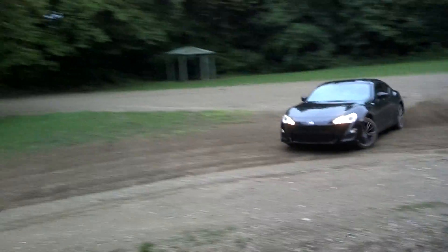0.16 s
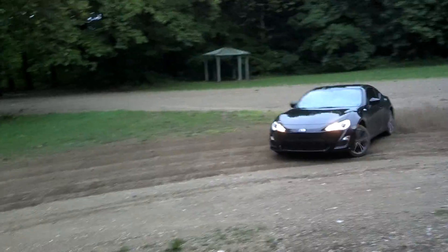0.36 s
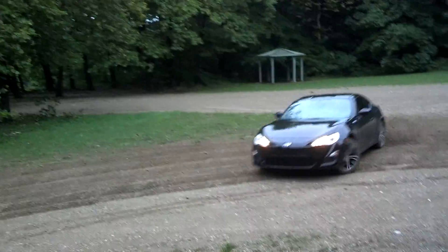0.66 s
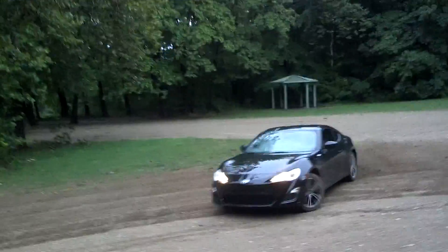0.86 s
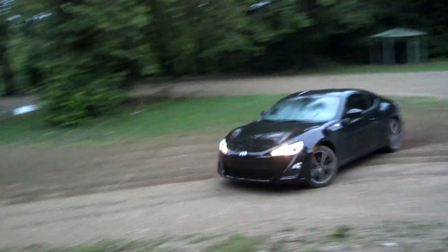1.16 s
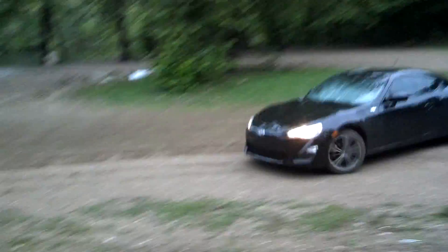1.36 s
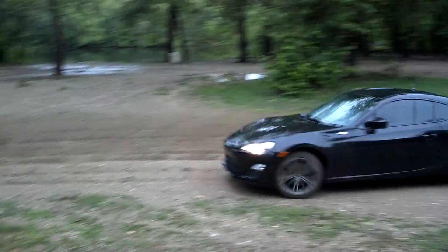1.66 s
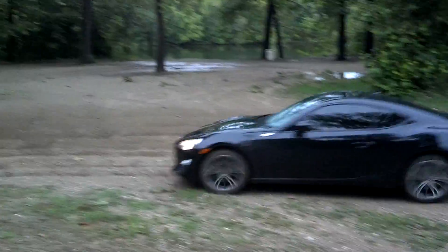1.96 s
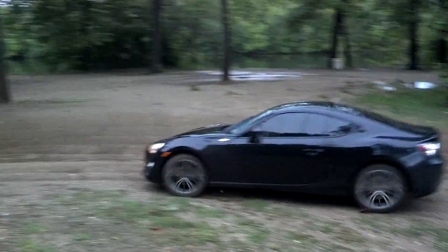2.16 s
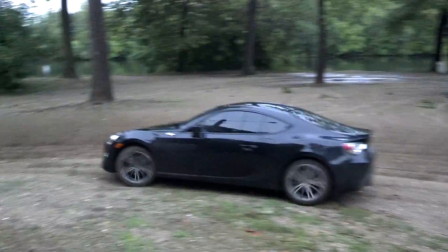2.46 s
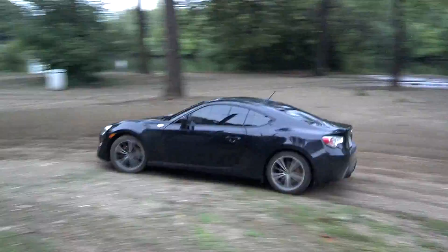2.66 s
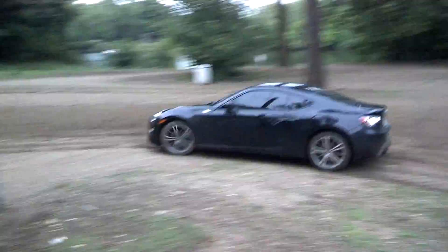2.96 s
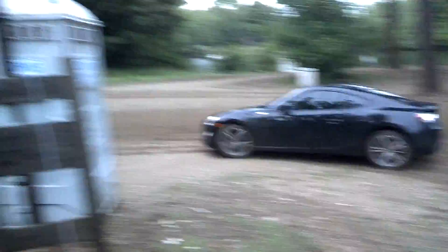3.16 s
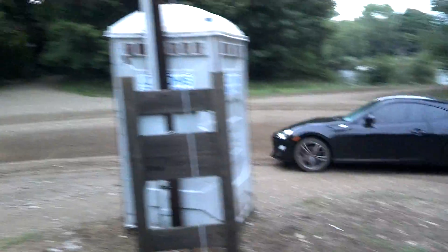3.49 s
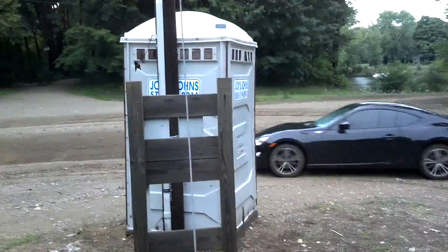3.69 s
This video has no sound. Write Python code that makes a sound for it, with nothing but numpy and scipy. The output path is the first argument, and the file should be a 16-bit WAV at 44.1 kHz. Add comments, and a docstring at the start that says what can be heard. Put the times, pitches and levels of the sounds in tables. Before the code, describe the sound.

Car tyres slide and crunch over loose gravel, stones cracking against the arches, engine humming low

```python
"""Car sliding past on wet gravel

Tyres grind over gravel: five bands of patchy noise and random stone clicks, from low rumble to spray.
Thrown stones ring the wheel arches, clods thump under the floor and pebbles tick, as decaying tones and puffs.
Under it the engine hums, as four sines locked to a gliding firing rate.
A small camera picks it up with one microphone and widens it into stereo by shifts of phase and level.
"""
import sys
import numpy as np
from scipy import signal
from scipy.fft import rfft, irfft, next_fast_len
from scipy.io import wavfile
from scipy.ndimage import uniform_filter1d, map_coordinates

SR = 44100
rng = np.random.default_rng(int(sys.argv[2]) if len(sys.argv) > 2 else 0)


def log_audio(samples):
    """Write samples as a 16-bit WAV file to the path given in sys.argv[1]."""
    # one column per channel
    frames = np.atleast_2d(samples).T
    # limit to full scale, then quantise
    limited = np.clip(frames, -1, 1)
    pcm = np.round(limited * 32767).astype(np.int16)
    wavfile.write(sys.argv[1], SR, pcm)


N = 168903

# Course of the slide. Each row: time in seconds, then the base levels of growl, grind, hiss, spray
# and rumble, each in dB.
SLIDE_LEVELS = [(0.0, -30, -30, -39, -40, -34), (0.02, -30.5, -29.5, -28.5, -40, -35),
                (0.07, -32.5, -28.5, -39.5, -44, -43.5), (0.1, -32.5, -27, -41, -45.5, -39.5),
                (0.38, -30.5, -26.5, -38, -43.5, -33), (0.49, -33, -24.5, -36, -46, -35),
                (0.5, -24.5, -22.5, -35, -47, -35), (0.6, -31, -25.5, -37, -46, -32),
                (0.8, -31.5, -26, -37, -46, -35), (1.04, -28, -22.5, -35, -46, -35),
                (1.08, -29.5, -26, -39.5, -49, -32.5), (1.23, -30.5, -25, -34, -48, -38.5),
                (1.36, -31, -26.5, -36, -48, -33.5), (1.41, -32, -27.5, -34.5, -48, -33),
                (1.45, -30, -21.5, -30.5, -46, -41), (1.47, -36, -29.5, -37, -47, -38.5),
                (1.52, -36, -26, -29.5, -40.5, -35), (1.66, -38.5, -34, -40, -52, -39.5),
                (1.91, -35, -32, -33, -44.5, -37), (2.07, -34, -31, -36, -49, -39),
                (2.212, -32.5, -27.5, -33.5, -44, -34.5), (2.233, -31, -27, -32.5, -40, -44),
                (2.238, -35, -28, -29, -37, -44), (2.256, -27, -28, -32.5, -45, -49),
                (2.27, -37.5, -36.5, -38, -50, -42), (2.41, -39.5, -34.5, -41, -52, -41),
                (2.53, -41.5, -31, -36.5, -48, -47), (2.57, -40, -39.5, -38, -49, -44),
                (2.63, -41, -29, -36.5, -46, -42.5), (2.69, -39, -31.5, -37, -48, -44.5),
                (2.86, -37.5, -29, -36, -47, -39), (3.0, -34, -26, -32, -39, -41.5),
                (3.15, -37, -29, -34.5, -45, -39), (3.21, -32, -25.5, -32.5, -45, -37.5),
                (3.23, -39.5, -33, -38, -49, -40.5), (3.39, -33.5, -32, -35.5, -50, -39.5),
                (3.57, -40.5, -32, -43.5, -52, -41.5), (3.59, -27.5, -31.5, -43, -44, -41),
                (3.64, -44, -33.5, -42, -55, -44), (3.69, -35.5, -29, -38.5, -51, -40.5),
                (3.83, -35.5, -32, -40.5, -55, -39)]

# Colours of the tyre bands, low to high. Each row: frequency in Hz, relative density in dB per Hz.
RUMBLE_COLOUR = [(20, -70), (45, -89), (65, -74.5), (110, -60), (200, -57.5), (290, -52.5), (340, -83.5),
                 (420, -120)]
GROWL_COLOUR = [(200, -110), (290, -64), (340, -61), (480, -55), (620, -57), (740, -62), (900, -103),
                (1300, -140)]
GRIND_COLOUR = [(450, -110), (600, -80.5), (740, -62.5), (1000, -52.5), (1200, -59.5), (1440, -58),
                (1680, -64.5), (1930, -61), (2200, -68.5), (2500, -66.5), (2800, -70.5), (3300, -72),
                (4500, -140)]
HISS_COLOUR = [(1500, -130), (2200, -85), (2700, -72), (3200, -68.5), (3800, -71), (4700, -76.5),
               (6500, -76), (8800, -79.5), (10000, -87), (11500, -110)]
SPRAY_COLOUR = [(6000, -140), (8500, -98), (9800, -89), (11000, -88), (13000, -88.5), (14200, -86.5),
                (15800, -86)]

# Stones striking the wheel arches. Each row: start in seconds, level in dB, pitch in Hz,
# time for the ring to fall 60 dB in seconds.
ARCH_STONES = [(0.013, -15, 980, .02), (0.353, -6, 1160, .012), (0.652, -10.5, 1054, 0.022),
               (0.946, -10, 1050, 0.018), (1.031, -11, 1430, 0.034), (1.044, -16, 1000, 0.025),
               (1.153, -7.5, 972, .02), (1.432, -10, 1010, 0.017), (2.2348, -10, 1300, 0.028),
               (2.7996, -1.5, 1007, 0.006), (3.157, -13.5, 1430, 0.036), (3.204, -14, 947, 0.023),
               (3.334, -9, 945, 0.0087)]
# Clods under the floor. Each row: start in seconds, level in dB, pitch in Hz.
FLOOR_CLODS = [(1.359, -15, 587), (3.224, -17, 274), (3.242, -17, 395), (3.334, -22, 550),
               (3.594, -16.5, 432.4)]
# Bright pebble ticks. Each row: start in seconds, level in dB before a 1.5 dB trim.
PEBBLE_TICKS = [(3.2103, -19), (3.281, -23)]

# Course of the engine. Each row: time in seconds, mean firing rate in Hz, level in dB.
ENGINE_COURSE = [(0, 188.4, -43), (.1, 194.8, -36.5), (.3, 206.6, -38), (.5, 210, -42), (.63, 195, -61),
                 (.69, 182.2, -33), (.92, 181.5, -34.5), (.98, 173, -49.5), (1.45, 160.1, -48),
                 (1.6, 141.6, -43.5), (1.72, 141, -40), (1.96, 148, -36), (2.3, 150.4, -40.5),
                 (2.47, 124.2, -45.5), (2.58, 117, -48), (2.7, 215, -49), (2.75, 222.7, -42.5),
                 (2.95, 227, -44.5), (3.1, 238, -56), (3.38, 229.7, -42), (3.62, 231, -43),
                 (3.83, 238, -58)]
# Engine orders. Each row: multiple of the firing rate, level in dB, depth of the level waver in dB.
ENGINE_ORDERS = [(.5, -13, 3), (1, 0, .8), (1.5, -7, 3), (2, -7, 3)]

# The stereo widener, right against left. Each row: frequency in Hz, phase lead in radians,
# level in dB, unrelated share from 0 to 1. Ignored inside the band where both sides are the same.
WIDENER = [(40, 2.4, 1.5, .3), (130, 1.6, 2, .12), (240, .7, 0, .15), (300, .6, -5, .3), (350, 1.2, -3, .2),
           (470, .6, 1.7, .1), (650, .05, -.5, .17), (730, .3, -5, .28), (785, .8, -1.5, .2),
           (960, .25, 1.7, .1), (1120, 0, 0, .05), (1200, 0, 0, .02), (1540, 0, 0, .03), (1650, 0, 1, .2),
           (1830, 0, 0, .25), (2000, .4, 2.5, .3), (2130, 0, 8, .45), (2280, -1.1, 5, .6),
           (2450, -1.8, 4.5, .9), (2560, -2.7, 2.5, 1)]

CRACK_DB, CRACK_T60_S = -16, 0.0062  # level is relative to the stone
CLOD_T60_S = 0.036
TICK_HZ, TICK_T60_S = 6280, 0.023
PITCH_WAVER = .003  # share of the firing rate
SAME_FROM_HZ, SAME_TO_HZ = 1190, 1545  # both sides alike between these
TREBLE_LAG_SAMPLES, TREBLE_UNRELATED = 16, .5  # delay of the right side; share from 0 to 1
TOP_HZ = 15770


def amp(db):
    """Decibels to amplitude."""
    return 10 ** (np.asarray(db) / 20)


def unit(x):
    """Scale to an rms of 1."""
    return x / np.sqrt(np.mean(x ** 2) + 1e-20)


def along(points, hz):
    """Columns after the frequency, read on a log axis."""
    f, *cols = np.transpose(points)
    return [np.interp(np.log(hz + 1), np.log(f + 1), c) for c in cols]


def curves(rows):
    """One value per sample for each column after the time."""
    s, *cols = np.transpose(rows)
    return [np.interp(np.arange(N) / SR, s, c) for c in cols]


def wobble(rate):
    """A smooth random curve with this many knots a second."""
    knots = rng.standard_normal(int(N * rate / SR) + 4)
    return map_coordinates(knots, [np.arange(N) * rate / SR])


def filtered(x, response):
    """Apply a complex response of frequency, padded so that tails do not wrap round."""
    m = 2 * next_fast_len(N // 2 + SR // 4)
    return irfft(rfft(x, m) * response(np.fft.rfftfreq(m, 1 / SR)), m)[..., :N]


def causal(colour):
    """Minimum-phase response of a colour, so that it rings only after each click."""
    def response(hz):
        cepstrum = irfft(np.log(amp(along(colour, hz)[0])))
        half = len(cepstrum) // 2
        # fold the part before time zero onto the part after it
        cepstrum[1:half] *= 2
        cepstrum[half + 1:] = 0
        return np.exp(rfft(cepstrum))[:len(hz)]
    return response


def crunch(colour, per_s, spread_db, grain_share, patchy_db):
    """Gravel under load: patchy noise mixed with random stone clicks, coloured, rms 1."""
    z = signal.stft(rng.standard_normal(N), nperseg=512)[2]
    field = uniform_filter1d(rng.standard_normal(z.shape), 5, 0)  # patches across frequency
    field = uniform_filter1d(field, 6, 1)  # and across time
    bed = unit(signal.istft(z * amp(patchy_db * unit(field)), nperseg=512)[1][:N])
    chance, sign, size = rng.random((3, N))
    # many small clicks, few large ones
    size = amp(-spread_db * np.log(size + 0.0064))
    clicks = unit((chance < per_s / SR) * np.sign(sign - .5) * size)
    share = np.clip(grain_share, 0, 1)  # share of the power
    mix = np.sqrt(1 - share) * bed + np.sqrt(share) * clicks
    return unit(filtered(mix, causal(colour)))


def tyres():
    """Five bands of the slide; clumps of gravel shake all but the rumble together."""
    growl_db, grind_db, hiss_db, spray_db, rumble_db = curves(SLIDE_LEVELS)
    clumps = 0.69 * wobble(29.94) + wobble(110)  # dB
    growl = amp(growl_db + 0.69 * clumps) * crunch(
        GROWL_COLOUR, per_s=600, spread_db=1.5, grain_share=0.36, patchy_db=0.8)
    grind = amp(grind_db + 0.95 * clumps) * crunch(
        GRIND_COLOUR, per_s=1500, spread_db=2.5, grain_share=0.47, patchy_db=1.54)
    # hiss and spray flutter faster on their own as well
    hiss = amp(hiss_db + 0.57 * clumps + wobble(200)) * crunch(
        HISS_COLOUR, per_s=2200, spread_db=2.5, grain_share=0.18, patchy_db=2.6)
    spray = amp(spray_db + .8 * clumps + .8 * wobble(200)) * crunch(
        SPRAY_COLOUR, per_s=3000, spread_db=2.5, grain_share=.2, patchy_db=2.2)
    rumble = amp(rumble_db) * crunch(
        RUMBLE_COLOUR, per_s=180, spread_db=2.0, grain_share=0.058, patchy_db=0.05)
    return growl + grind + hiss + spray + rumble


def hit_time():
    """Seconds since a hit, for the tenth of a second that each one lasts."""
    return np.arange(SR // 10) / SR


def add_hit(out, start_s, hit):
    """Add one hit to the track at its start."""
    out[round(start_s * SR):][:len(hit)] += hit


def arch_stones():
    """Each stone rings the wheel arch at two pitches over a short noisy crack."""
    out, t = np.zeros(N + SR), hit_time()
    attack = 1 - np.exp(-t / 0.00082)
    for start_s, db, hz, t60 in ARCH_STONES:
        ring = np.sin(2 * np.pi * hz * t) + 0.42 * np.sin(2 * np.pi * 1.35 * hz * t)
        dull_noise = uniform_filter1d(rng.standard_normal(len(t)), size=4)
        crack = amp(CRACK_DB - 60 * t / CRACK_T60_S) * dull_noise
        add_hit(out, start_s, amp(db) * (amp(-60 * t / t60) * ring * attack + crack))
    return out[:N]


def floor_clods():
    """Each clod thumps the floor as one low, decaying sine."""
    out, t = np.zeros(N + SR), hit_time()
    attack = 1 - np.exp(-t / 0.0017)
    for start_s, db, hz in FLOOR_CLODS:
        add_hit(out, start_s, amp(db - 60 * t / CLOD_T60_S) * np.sin(2 * np.pi * hz * t) * attack)
    return out[:N]


def pebble_ticks():
    """Each tick is a short bright puff: noise passed through a brief burst of one pitch."""
    out, t = np.zeros(N + SR), hit_time()
    attack = 1 - np.exp(-t / 0.0011)
    burst = np.hanning(40) * np.sin(2 * np.pi * TICK_HZ * t[:40])
    for start_s, db in PEBBLE_TICKS:
        puff = unit(np.convolve(rng.standard_normal(len(t)), burst, "same"))
        add_hit(out, start_s, amp(db - 1.5 - 60 * t / TICK_T60_S) * puff * attack)
    return out[:N]


def engine():
    """Low orders locked to the firing rate, each slightly unsteady in level."""
    hz, db = curves(ENGINE_COURSE)
    turn = 2 * np.pi * np.cumsum(hz * (1 + PITCH_WAVER * wobble(25.5))) / SR
    hum = np.zeros(N)
    for multiple, order_db, waver_db in ENGINE_ORDERS:
        level = amp(order_db + waver_db * wobble(12))
        hum += level * np.sin(multiple * turn + 2 * np.pi * rng.random())
    return np.sqrt(2) * amp(db) * hum  # root 2 brings a sine to rms 1


def scene():
    """The whole car at one microphone, the same in both channels."""
    car = tyres() + arch_stones() + floor_clods() + pebble_ticks() + engine()
    return np.array([car, car])


def widen(x):
    """Right is left turned in phase, in the treble inverted and delayed; some of the difference is scrambled."""
    z = signal.stft(x, nperseg=512)[2]
    scrambled = signal.istft(z * np.exp(2j * np.pi * rng.random(z.shape)), nperseg=512)[1][:N]
    scrambled = unit(scrambled) * x.std()

    def split(hz):
        """Responses of the middle, the related side and the unrelated side."""
        differs = (hz < SAME_FROM_HZ) | (hz > SAME_TO_HZ)
        lead, db, share = along(WIDENER, hz) * differs
        low = hz < WIDENER[-1][0]
        treble = -np.exp(-2j * np.pi * hz * TREBLE_LAG_SAMPLES / SR)
        right = np.where(low, amp(db) * np.exp(1j * lead), treble)
        share = np.clip(np.where(low, share, TREBLE_UNRELATED), 0, 1)
        mid, side = (1 + right) / 2, (1 - right) / 2
        loose = np.where(low, np.abs(mid) * share, np.abs(side) * np.sqrt(share))
        # in the treble the scrambled part takes the place of related side
        related = side * np.where(low, 1, np.sqrt(1 - share))
        return np.array([mid, related, loose])

    mid, side = filtered(x, lambda hz: split(hz)[:2])
    side = side + filtered(scrambled, lambda hz: split(hz)[2])
    return np.array([mid + side, mid - side])


def record(dry):
    """The camera's one microphone, widened, with nothing above the band limit."""
    return filtered(widen(dry[0]), lambda hz: hz < TOP_HZ)


dry = scene()
out = record(dry)
log_audio(out)
```